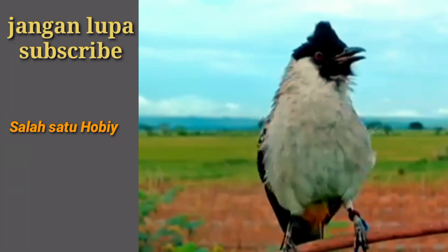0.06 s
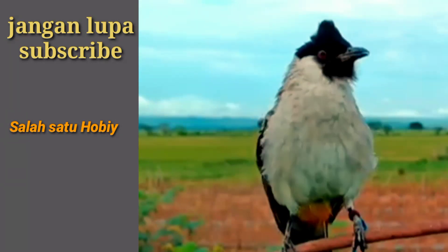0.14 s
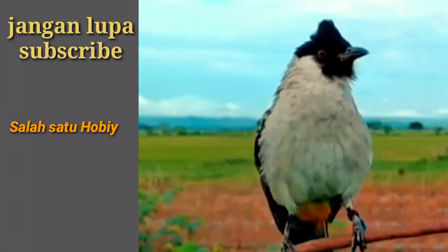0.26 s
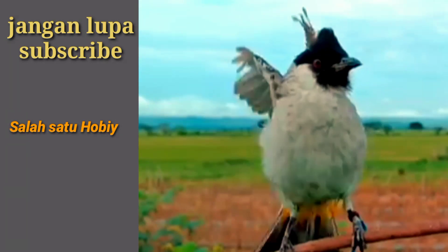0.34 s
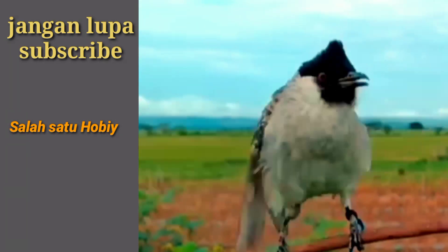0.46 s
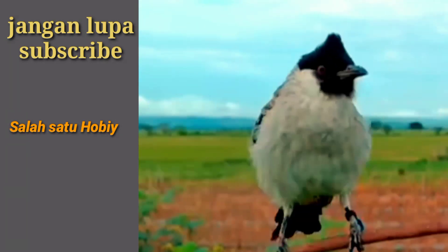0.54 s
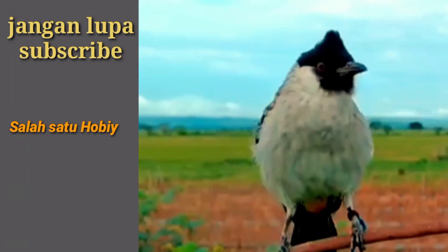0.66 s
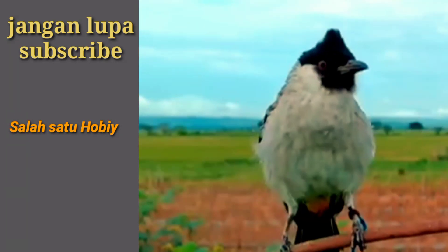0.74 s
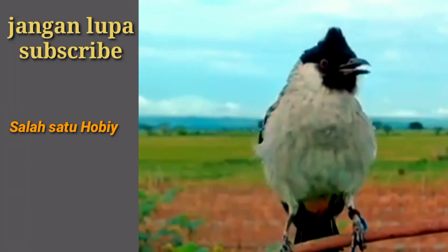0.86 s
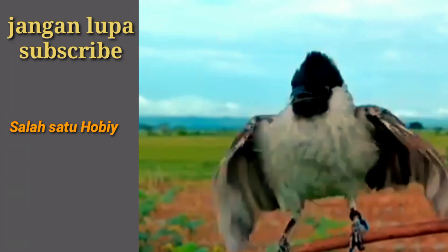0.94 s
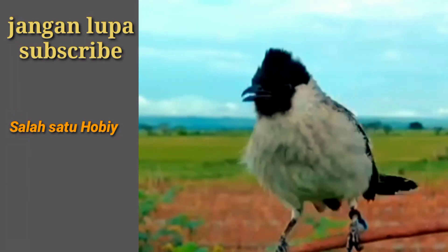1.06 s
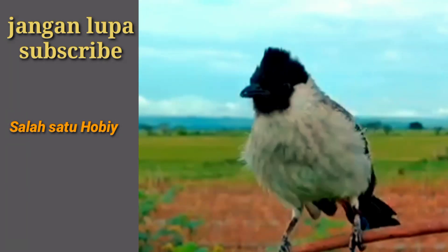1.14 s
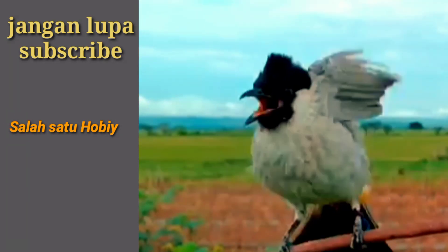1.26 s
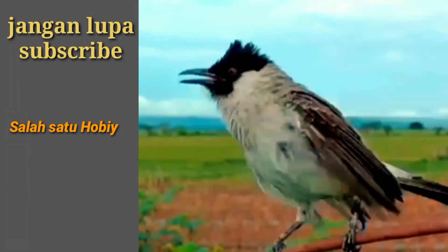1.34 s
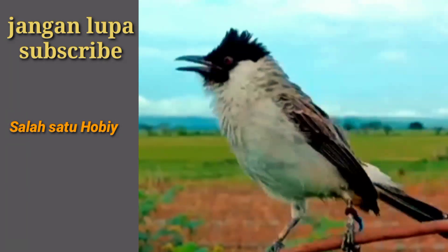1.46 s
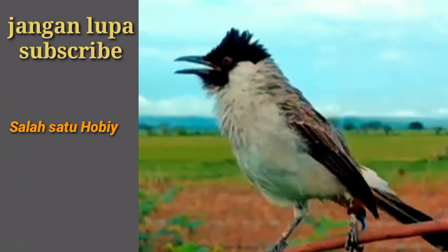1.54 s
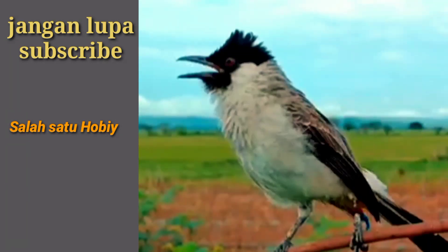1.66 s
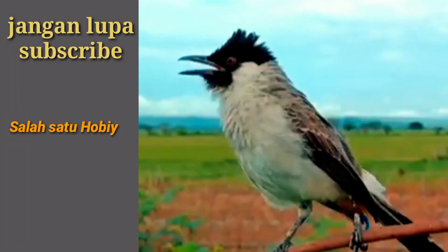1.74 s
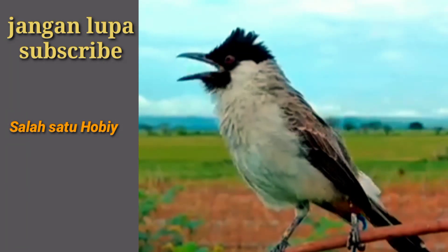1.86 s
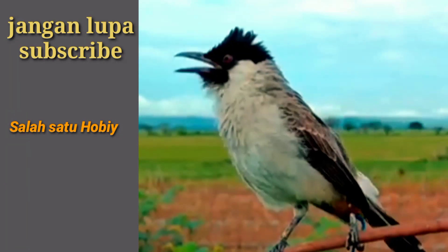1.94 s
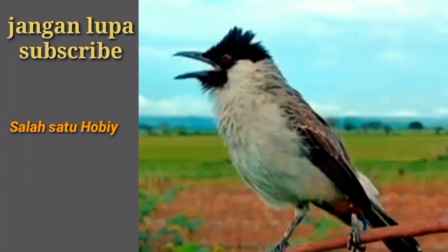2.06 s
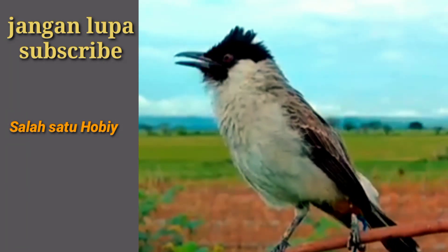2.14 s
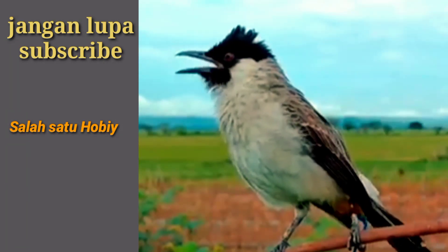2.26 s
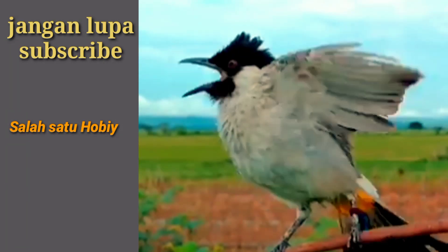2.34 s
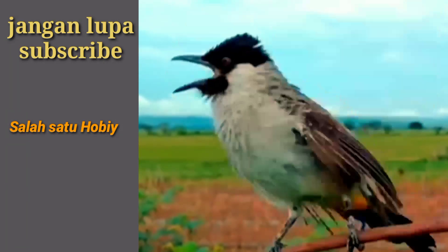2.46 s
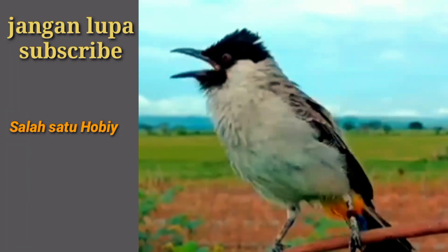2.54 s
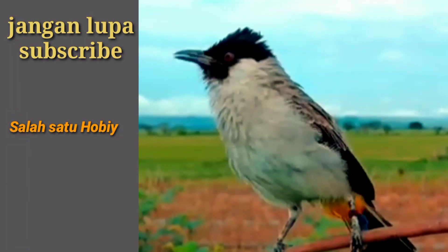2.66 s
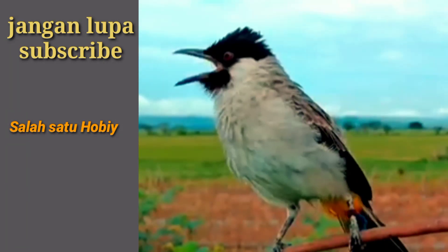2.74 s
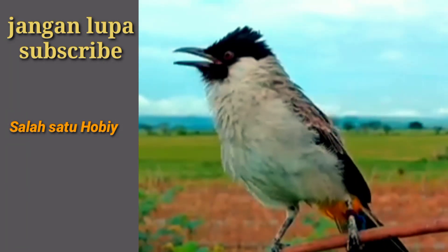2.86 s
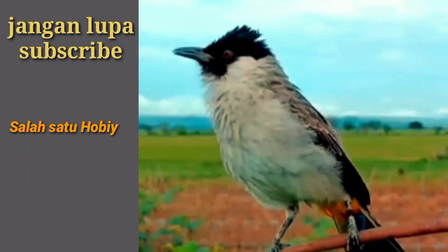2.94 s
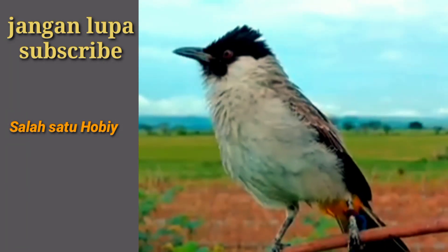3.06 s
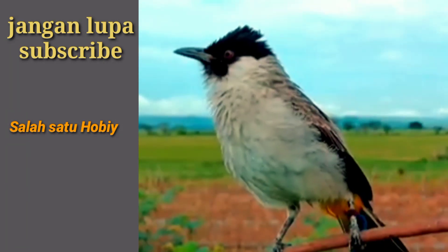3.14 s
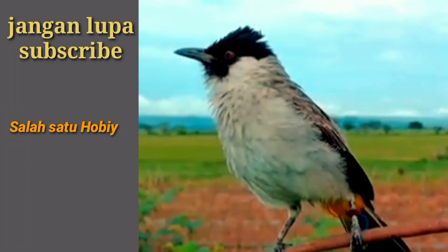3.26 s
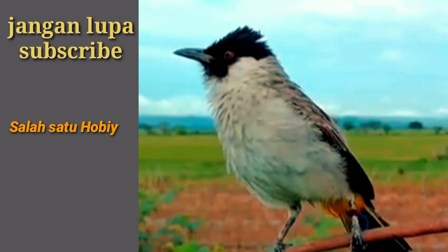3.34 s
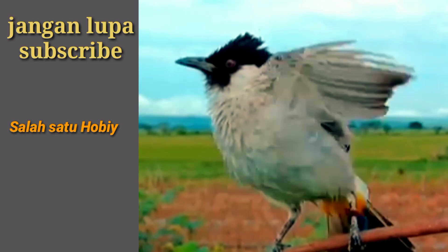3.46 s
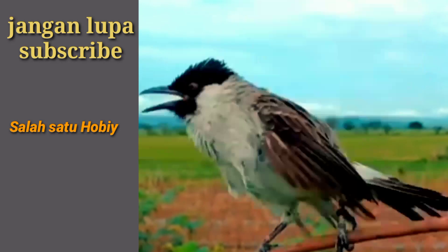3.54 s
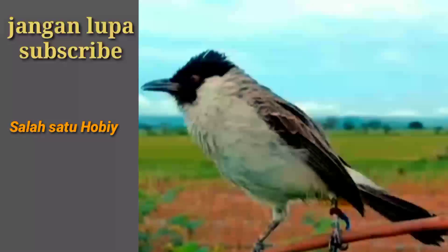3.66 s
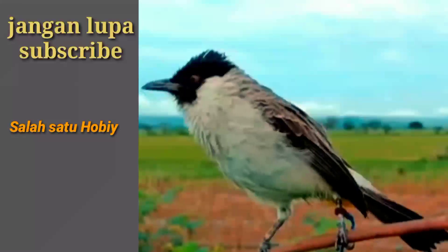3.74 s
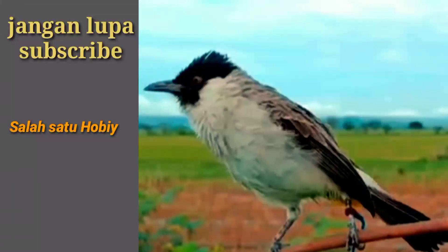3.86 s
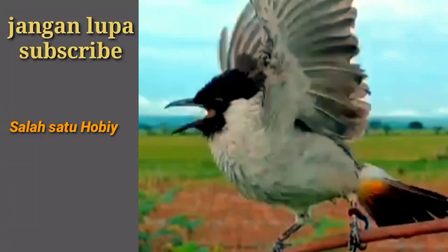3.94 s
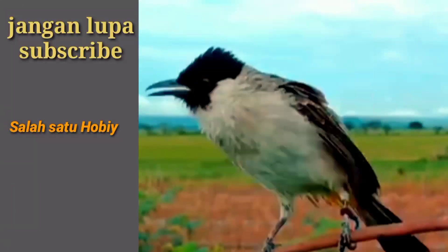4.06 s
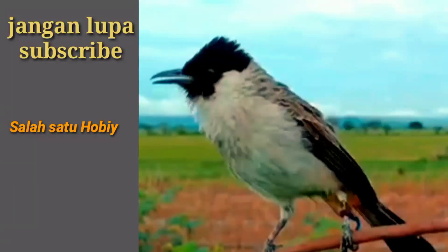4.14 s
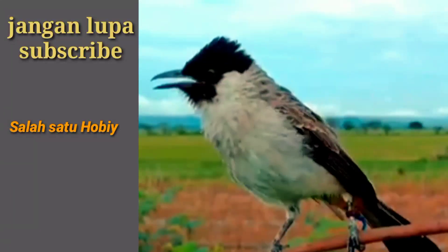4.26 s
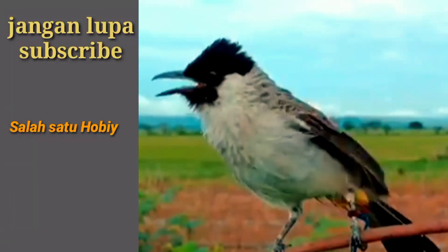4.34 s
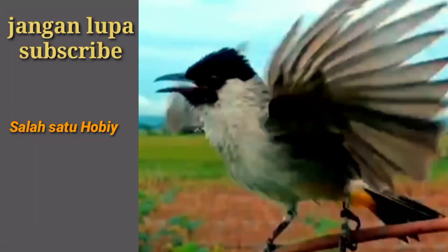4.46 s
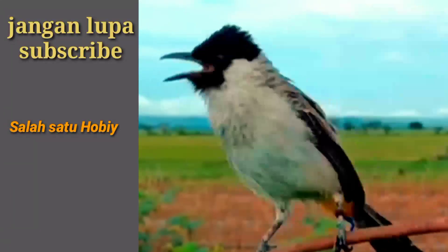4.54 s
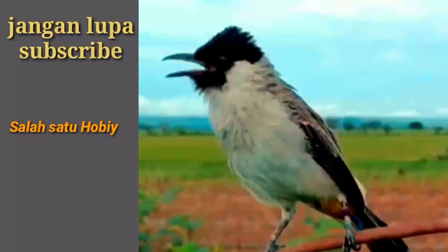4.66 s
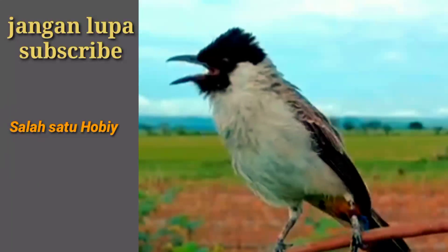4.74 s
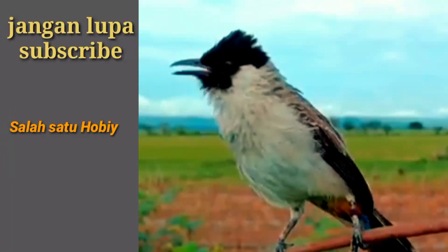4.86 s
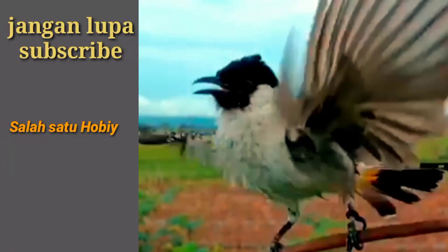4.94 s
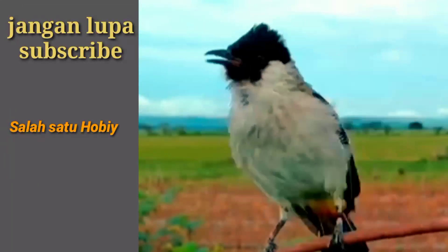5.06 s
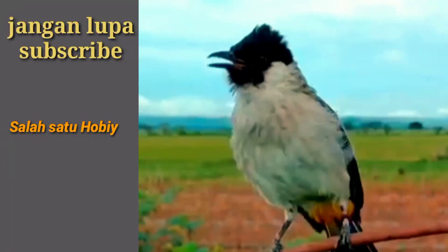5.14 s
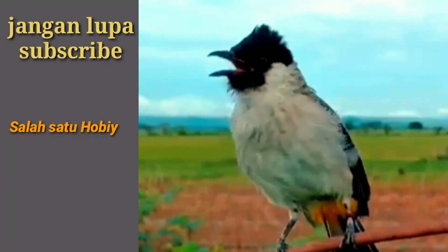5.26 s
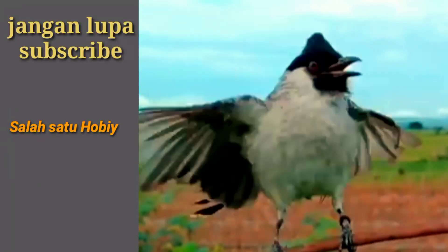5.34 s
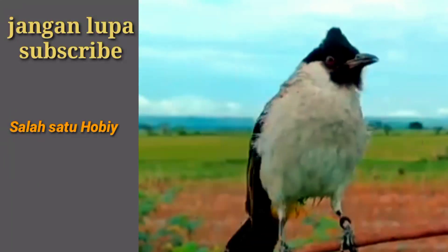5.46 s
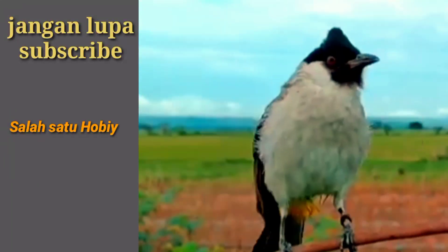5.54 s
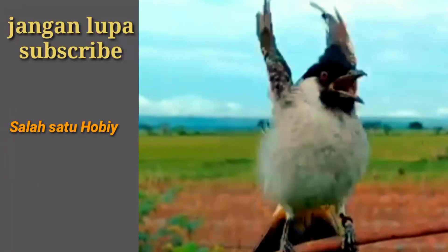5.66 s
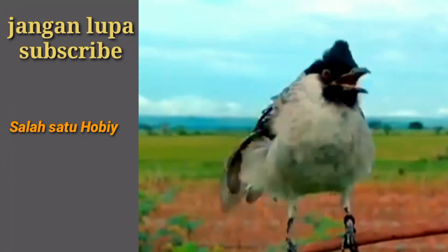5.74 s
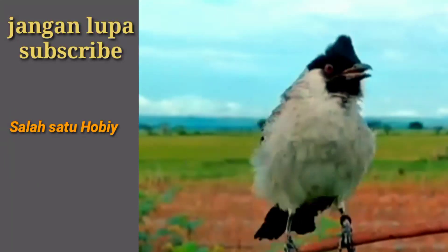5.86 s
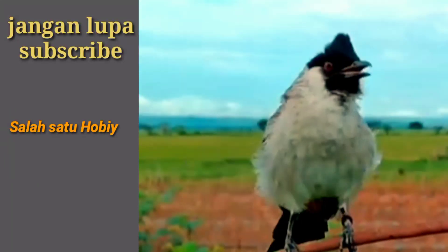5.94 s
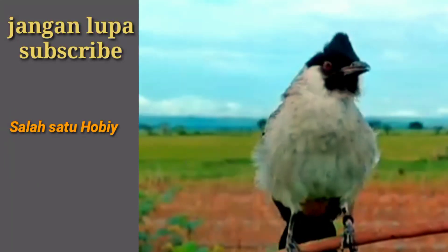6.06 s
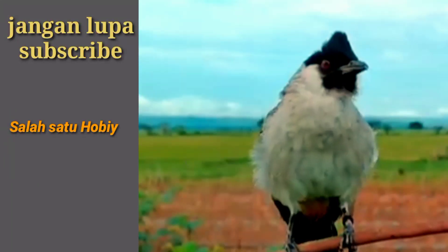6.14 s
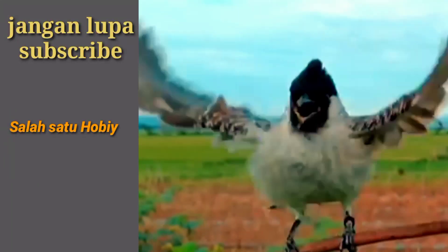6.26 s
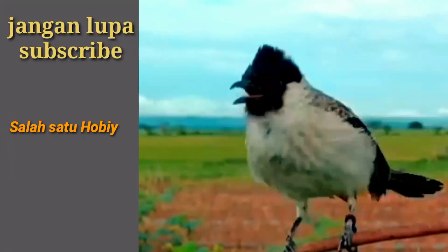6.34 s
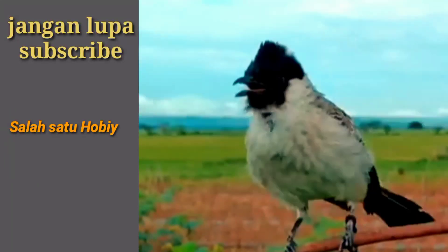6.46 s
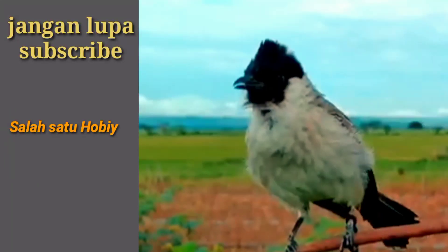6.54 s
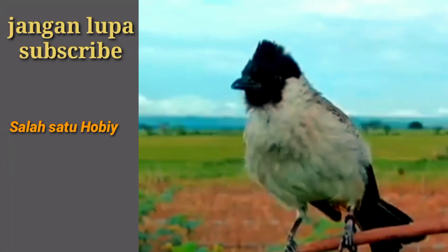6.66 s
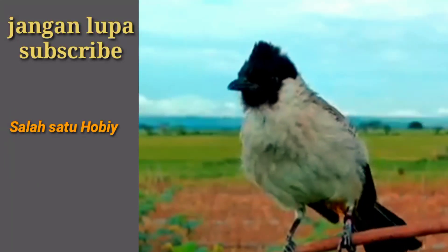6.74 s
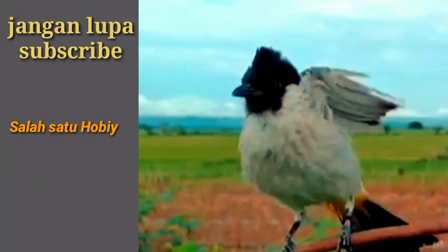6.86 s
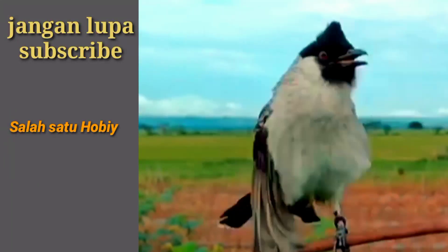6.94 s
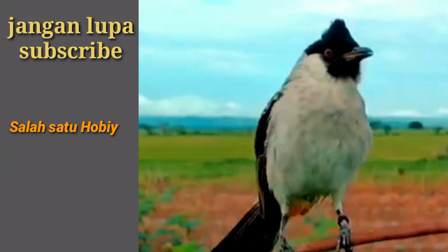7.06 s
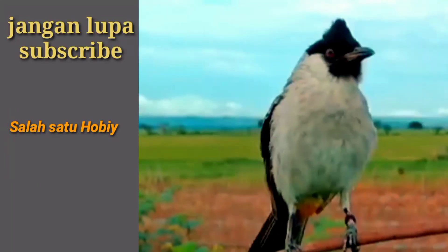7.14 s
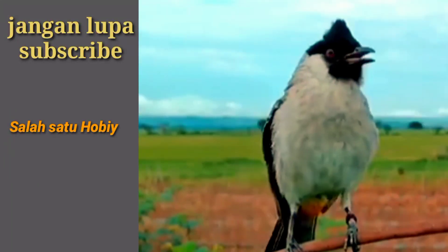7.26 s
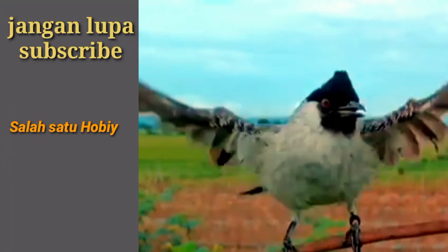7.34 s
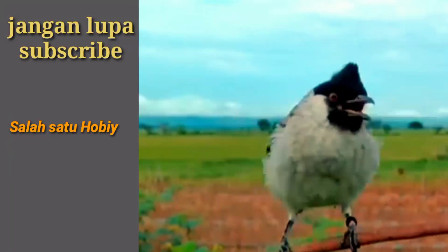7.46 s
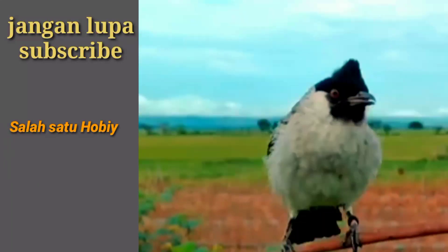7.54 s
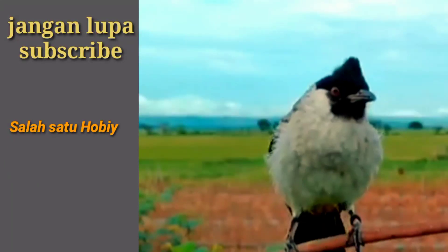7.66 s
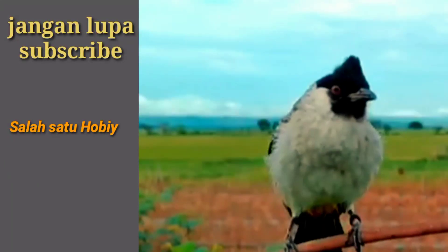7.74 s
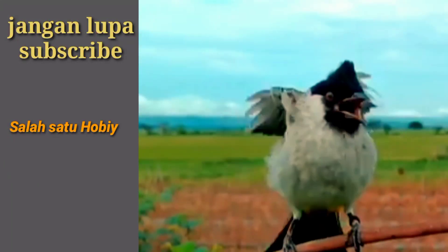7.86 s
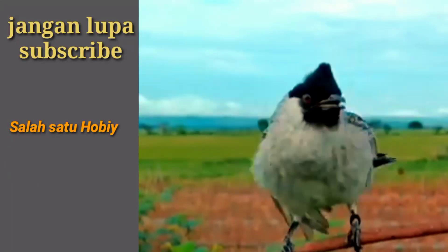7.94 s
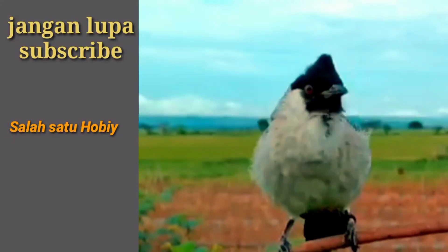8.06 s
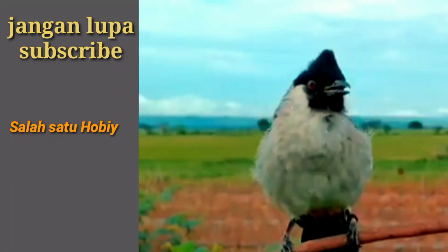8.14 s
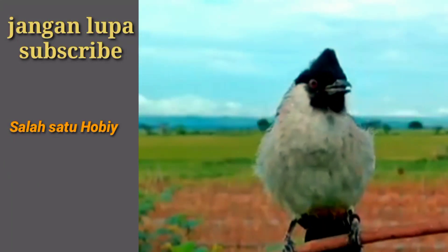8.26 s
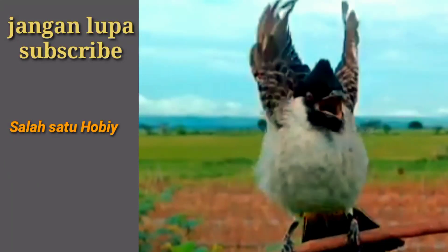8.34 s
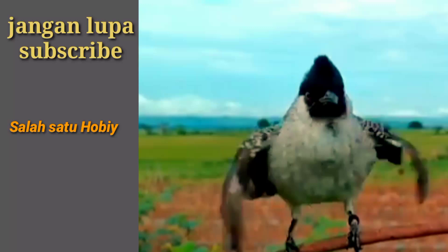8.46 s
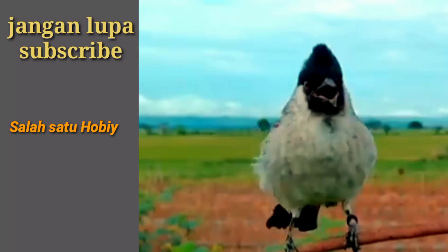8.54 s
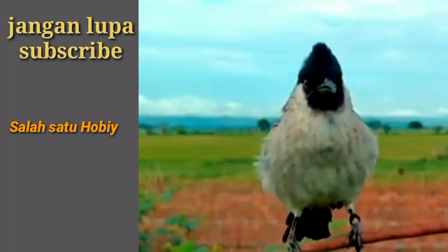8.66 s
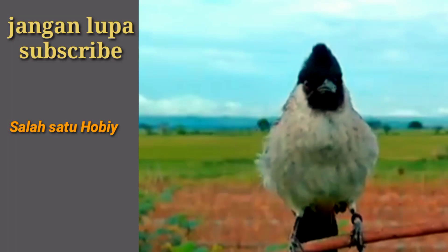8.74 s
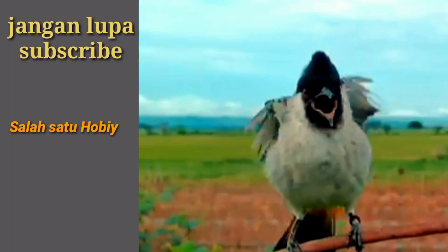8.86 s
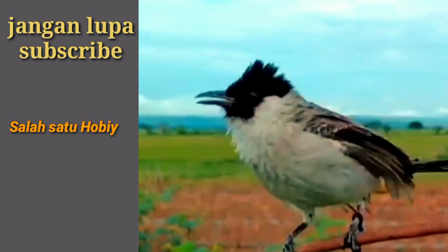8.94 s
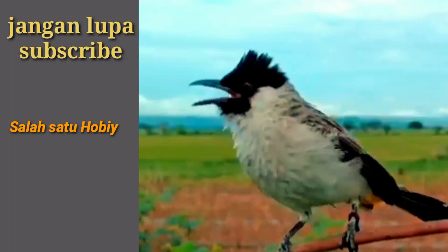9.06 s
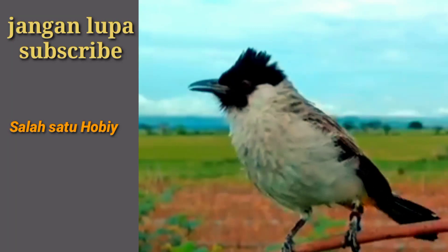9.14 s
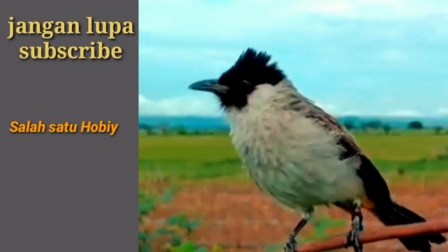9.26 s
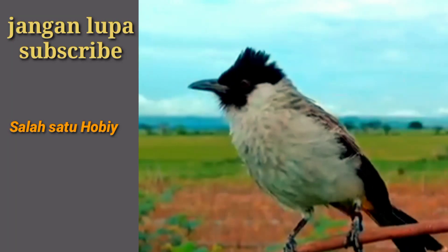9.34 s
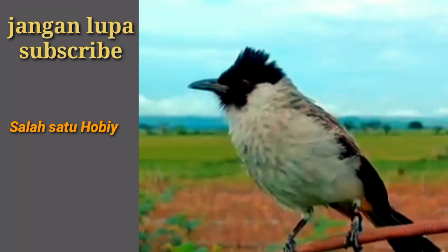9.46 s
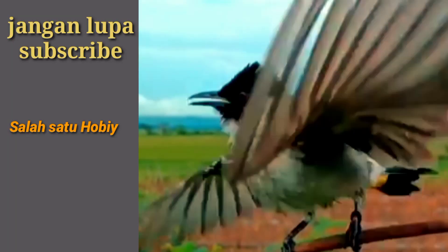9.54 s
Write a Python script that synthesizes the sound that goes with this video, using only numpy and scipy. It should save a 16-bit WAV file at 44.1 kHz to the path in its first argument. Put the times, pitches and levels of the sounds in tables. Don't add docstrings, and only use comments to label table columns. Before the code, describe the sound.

Very loud liquid bird whistles and raspy buzzing chirps burst out over faint insects and low wind rumble; one gust slaps the microphone midway.

```python
import sys
import numpy as np
from scipy import signal
from scipy.fft import rfft, irfft
from scipy.io import wavfile
from scipy.ndimage import uniform_filter1d

SR = 44100
rng = np.random.default_rng(int(sys.argv[2]) if len(sys.argv) > 2 else 0)


def decibels_to_gain(level_db):
    exponent = np.asarray(level_db, float) / 20
    return 10 ** exponent


def store_wav(level_fs):
    pcm = np.round(np.clip(np.atleast_2d(level_fs), -1, 1) * 32767)
    wavfile.write(sys.argv[1], SR, pcm.T.astype(np.int16))


N = 423360
SLAP_S = 3.7835

# (time [s], pitch [Hz], peak level [dB])
PICKUP = [(0, 1740, -53.5), (.006, 1750, -11), (.0135, 1790, -14.5), (.0205, 2180, -11.5),
          (.0279, 2100, -3), (.0344, 2080, -20), (.0394, 1590, -41.5)]
CREAK = [(.0437, 1488, -45.5), (.0477, 1520, -17.5), (.0562, 1426, -21), (.0592, 1484, -14),
         (.0627, 2310, -10), (.0698, 2780, -20)]
SWING = [(.0683, 2627, -19.5), (.0711, 2352, -6.5), (.0746, 3073, 0), (.0821, 2930, 0.5),
         (.0871, 2370, -4.5), (.103, 2360, 3), (.1155, 2276, -3.5), (.123, 2173, -22)]
HOP = [(.1215, 2083, -18.5), (.1265, 1703, -11.5), (.1325, 2293, -0.9), (.1415, 2650, 2),
       (.147, 2470, -1.6), (.1525, 1972, -10)]
SCOOP = [(.151, 2018, -16), (.163, 1794, -1.5), (.1734, 1711, -9), (.185, 1841, -13.5), (.2053, 2390, 3),
         (.2108, 2373, -3), (.2203, 2372, -26)]
LEAD = [(0, 1994, -16), (.0035, 1970, -16.5), (.008, 2440, -7.5), (.0205, 2430, -3), (.0354, 2830, 3),
        (.0474, 2848, 0.5), (.0544, 2650, -22.5)]
HIGH = [(0, 1398, -30.5), (.003, 1749, -24.5), (.0065, 2850, -12), (.0085, 2940, -0.4), (.0239, 2871, 2.5),
        (.0349, 3062, 1), (.0469, 2933, 0.8), (.0574, 3040, -40.5)]
SOFT_HIGH = [(0, 1408, -22.5), (.004, 2327, -21.5), (.006, 2790, -15), (.0095, 2936, -4.5),
             (.0239, 2890, 1), (.0349, 3062, 6), (.0449, 2953, -3), (.054, 3040, -45)]
DROP = [(.069, 2553, -21.5), (.0725, 2700, -5), (.078, 2652, 0.9), (.085, 2251, -6), (.089, 1995, -16),
        (.094, 1703, -12.5), (.103, 1820, -17), (.1065, 2246, -31.5), (.118, 2595, -21)]
RISE = [(.1125, 2526, -37), (.117, 2640, -23.5), (.12, 2602, -10.5), (.131, 2523, 1.5), (.159, 2729, 2.5),
        (.163, 2650, -4.5), (.167, 2693, -13.5), (.171, 2780, -35)]
PEAKED = [(0, 1521, -34.5), (.0055, 1652, -18), (.014, 1826, -8), (.019, 2060, -2.5), (.0225, 2820, -12.5),
          (.027, 2310, -9.5), (.0324, 2110, -3), (.038, 2020, -6.5), (.042, 1956, -15)]
LOOP = [(.0405, 2858, -21), (.054, 3030, -14), (.057, 3700, 1), (.061, 4530, -4), (.066, 4770, -7),
        (.072, 4286, -4.5), (.079, 3450, 0.3), (.085, 2842, 0), (.0915, 2732, -1.5)]
FLICK = [(.09, 2720, -6), (.0935, 3880, 2.5), (.099, 3750, -1.5), (.112, 3107, 0), (.118, 2930, -31),
         (.128, 3270, -27)]
FALL = [(.163, 2540, -31), (.169, 2970, -13), (.189, 3015, -0.2), (.208, 3305, 1.5), (.221, 3010, 3),
        (.231, 2400, -7), (.2405, 1450, -26), (.2505, 950, -26), (.263, 940, -38)]
SLIDE = [(0, 1600, -31.5), (.0055, 2103, -22), (.008, 2910, -1.5), (.0105, 3102, 0), (.0334, 2603, 2.5),
         (.041, 2612, 2.5), (.0455, 2790, -4), (.061, 2677, 2.8), (.0703, 2310, -20)]
SADDLE = [(.069, 1941, -18.5), (.078, 3300, 0.5), (.0838, 3610, -2), (.088, 2964, -0.5), (.114, 2297, 2.5),
          (.1317, 2372, 1.5), (.1417, 2810, 1.5), (.162, 2545, -1.4), (.17, 1544, -22.5)]
CLOSE = [(.1685, 1479, -18.5), (.1742, 1330, -24.5), (.1872, 1586, -13.5), (.1994, 2650, 0.5),
         (.207, 2827, -2.5), (.2227, 2397, -2), (.2257, 1880, -5), (.2347, 2140, -8.5), (.242, 1980, -38.5)]
GULP = [(0, 1856, -46.5), (.0025, 1827, -19), (.0065, 1833, -15.5), (.011, 1463, -13), (.0155, 1473, -16.5),
        (.0264, 1800, -11.5), (.031, 2132, 0.5)]
BUBBLE = [(.0295, 2044, -20), (.0329, 2900, 5), (.0369, 3327, -7), (.0405, 2506, -1.5), (.0454, 1988, -5),
          (.0619, 2262, 2), (.071, 1493, -6), (.0835, 1800, -6.5), (.0965, 2004, -31)]
CHIRP = [(.095, 2050, -19.5), (.1019, 2406, -1.5), (.1123, 2548, 1.5), (.1168, 3043, -1), (.124, 2720, 2.5),
         (.137, 2536, 0.5), (.1425, 1950, -5.5), (.149, 2204, -1.5), (.161, 2305, -38)]
# (time [s], length [factor], first note's start pitch [factor], its end pitch [factor], level [dB])
CHATTER = [(1.812, 1.004, 1.04, 1.007, -0.29), (2.0328, 0.99, 1.063, 1, 0.013), (2.2554, 1, 1.05, 1, -0.36),
           (4.5136, 0.99, 1.035, 1.016, -0.12), (4.7343, 1, 1.056, 1, -0.3),
           (4.9642, 1.005, 1.006, 1.001, 0.17), (5.198, 1.005, 1.002, 1.028, 0.059),
           (5.4478, 0.99, 0.98, 1.01, 0.49)]
TRILLS = [(2.57, 1.0055, 1.001, 1.001, 0.12), (2.9337, 1.002, 1.001, .96, -0.24)]
WARBLES = [(5.9819, 1.001, 1.03, .99, 0.13), (6.565, 1.001, 1.047, 0.96, -0.074)]
GURGLES = [(8.2296, .95, 0.85, 1.01, -0.15), (8.6573, 0.97, 0.99, 0.95, -0.27),
           (9.1536, 0.99, 0.93, 1.02, -0.75)]
# ([(note shape, second-partial lift [dB], half-pitch line level [dB])], [sung phrases, as above])
PHRASES = [([(PICKUP, -2.9, -44.5), (CREAK, -12, -37.5), (SWING, 2, -44), (HOP, -6, -43.5),
           (SCOOP, -11, -51)], [(.0748, .999, 1.06, 0.99, .1)]), ([(LEAD, 1.5, -45.5), (DROP, 1.5, -46.5),
           (RISE, -1.5, -34)], [(1.6004, 1.015, 1, 0.99, -0.87)]), ([(HIGH, 2.2, -32.5)],
           [(2.4815, 1.044, 1.03, 1.083, -0.091)]), ([(SOFT_HIGH, 13, -42), (DROP, 2.8, -54),
           (RISE, -1.5, -35.5)], [(4.2985, 0.98, 0.97, 1, -2.1)]), ([(HIGH, 5.7, -36), (DROP, 1.7, -48.5),
           (RISE, 0.14, -33)], CHATTER), ([(PEAKED, 35, -27), (LOOP, 11, -38.5), (FLICK, 3, -35),
           (FALL, 4.7, -35.5)], TRILLS), ([(SLIDE, 1.5, -29.5), (SADDLE, -0.86, -33), (CLOSE, -8, -46)],
           WARBLES), ([(GULP, 1.9, -8), (BUBBLE, -2.3, -49), (CHIRP, -7, -38.5)], GURGLES)]
# (time [s], pitch [Hz], peak level [dB])
DIP = [(0, 3294, -47), (.008, 3280, -33), (.018, 2874, -28), (.03, 2380, -38.5), (.04, 2810, -28),
       (.056, 3080, -27.5), (.066, 2990, -36), (.078, 3115, -45)]
RIPPLE = [(0, 2760, -57), (.013, 2570, -34), (.03, 2715, -33), (.04, 2433, -34), (.05, 2414, -38.5),
          (.07, 2663, -30), (.08, 2480, -34.5), (.095, 2486, -46.5), (.105, 2620, -56)]
HOOK = [(0, 2700, -55), (.01, 2840, -34), (.016, 3140, -33), (.024, 2900, -31), (.036, 2800, -28.5),
        (.044, 2683, -39), (.05, 2350, -52.5)]
STEP = [(0, 2230, -52), (.008, 2285, -30), (.017, 2585, -46), (.027, 3035, -20), (.037, 2900, -28),
        (.052, 2500, -29), (.062, 2380, -39.5)]
# (note shape, time [s], length [factor], level [dB])
ANSWERS = [(DIP, 1.25, 1, 0), (RIPPLE, 1.353, .95, 0), (DIP, 7.722, 1.25, -5), (RIPPLE, 7.846, 1, -3),
           (HOOK, 8.956, 1, 0), (STEP, 8.181, 1, 0)]


def read(points, at):
    x, value = np.transpose(points)
    return np.interp(at, x, value)


def evened(x):
    return x / np.sqrt(np.mean(x ** 2) + 1e-20)


def smooth_noise(n, size):
    return evened(uniform_filter1d(rng.standard_normal(n), size=size))


def add(mix, s, sound):
    at = round(s * SR)
    part, sound = mix[max(at, 0):], sound[max(-at, 0):]
    part[:len(sound)] += sound[:len(part)]


def phase(hz):
    return 2 * np.pi * np.cumsum(hz) / SR


def resonate(x, hz, width_hz):
    turn = np.exp(1j * phase(hz * np.ones(len(x))))
    r = np.exp(-np.pi * width_hz / SR)
    return 2 * (turn * signal.lfilter([(1 - r) ** 2], [1, -2 * r, r * r], x / turn)).real


def contour(rows, stretch=1):
    s, hz, db = np.transpose(rows)
    t = np.arange(0, (s[-1] - s[0]) * stretch, 1 / SR)
    at = t / stretch + s[0]
    hz, db = (uniform_filter1d(np.interp(at, s, c), size=45, mode="nearest") for c in (hz, db))
    hz = uniform_filter1d(hz, size=70, mode="nearest")
    return t / t[-1], hz, decibels_to_gain(db) * signal.windows.tukey(len(t), 130 / len(t))


def chorus():
    # (centre [Hz], width [Hz], level [dB])
    bands_db = [
        (3700, 300, -74.5),
        (6100, 1100, -52),
        (7420, 1200, -59),
        (9205, 1300, -65.5),
        (10200, 1800, -64),
        (256, 57, -67.5),
    ]
    throb = 1 + 0.19 * np.sin(2 * np.pi * 62 * np.arange(N) / SR)
    bands = []
    for hz, width_hz, db in bands_db:
        band = resonate(resonate(rng.standard_normal(N), hz, width_hz), hz, width_hz)
        bands.append(decibels_to_gain(db) * evened(band))
    hiss = decibels_to_gain(-58) * rng.standard_normal(N)
    edge = signal.butter(8, 10800, fs=SR, output="sos")
    return signal.sosfilt(edge, sum(bands) + (throb - 1) * bands[1] + hiss)


def wind():
    # (frequency [Hz], level [dB per Hz])
    rumble_db = [(12, -30), (20, 4), (82, 0), (201, -19), (380, -46), (700, -68), (910, -100), (1540, -120)]
    # (time [s], peak level [dB], dying time [s])
    gust_rows = [(0.325, -29, 0.45), (0.69, -27.5, 0.34), (1.016, -25, 0.15), (1.257, -29, 0.071),
                 (1.555, -15, 0.024), (2.671, -27, 0.026), (3.206, -27, 0.061), (3.74, -16.5, 0.046),
                 (3.776, 5.5, 0.027), (4.236, -7, 0.039), (4.462, -26, 0.077), (4.671, -24, 0.11),
                 (5.2, -23, 0.079), (5.925, -30, 0.056), (6.489, -19.5, 0.034), (8.3, -39, 0.024),
                 (9.065, -22, 0.055)]
    # (time [s], pressure step [full scale])
    flaps = [
        (3.801, -0.67),
        (3.8046, 1),
        (3.821, 0.43),
    ]
    breeze_db, rise_s, trim_db = -45.5, 0.0042, -1.5
    roar_db, lumps_db = -24.5, 3
    slap_hz, slap_db, slap_dying_s, flap_rise_s, flap_dying_s = 88, 3, .036, 0.00041, .004

    hz = np.fft.rfftfreq(N, 1 / SR)
    f, db = np.transpose(rumble_db)
    tilt_db = np.interp(np.log(hz + 1), np.log(f), db, right=-90)
    rumble = irfft(rfft(rng.standard_normal(N)) * decibels_to_gain(tilt_db), N)
    lumps = evened(uniform_filter1d(uniform_filter1d(rng.standard_normal(N), size=1800), size=1800))

    s, peak_db, dying_s = np.transpose(gust_rows)[..., None]
    late = np.arange(0, N + 64, 64) / SR - s - rise_s
    gusts = decibels_to_gain(peak_db + trim_db) * np.exp(-np.where(late < 0, -late / rise_s, late / dying_s))
    force = np.interp(np.arange(N) / 64, np.arange(late.shape[1]), decibels_to_gain(breeze_db) + gusts.sum(0))
    turbulence = evened(resonate(rng.standard_normal(N), 200, 590))
    roar = decibels_to_gain(roar_db + lumps_db * lumps) * force ** 1.5 * turbulence

    t = np.arange(N) / SR - SLAP_S
    slap = np.exp(-(t / slap_dying_s) ** 2)
    swing = decibels_to_gain(slap_db) * slap * np.sin(2 * np.pi * slap_hz * t)
    ring = (t > 0) * np.clip(swing, -.8, .65)
    after = np.arange(1500) / SR
    for s, step in flaps:
        add(ring, s, step * np.exp(-after / flap_dying_s) * (1 - np.exp(-after / flap_rise_s)))
    return evened(rumble * decibels_to_gain(lumps_db * lumps)) * force * (1 - slap) + ring + roar


def crickets():
    # (first chirp [s], last chirp [s], pitch [Hz], level [dB])
    bouts = [(.325, 0.428, 4440, -48), (1.289, 1.432, 4450, -46), (3.2, 3.692, 4460, -47),
             (3.84, 3.94, 4370, -61), (5.388, 5.823, 4440, -52), (6.829, 7.069, 4450, -47),
             (7.21, 7.408, 4450, -47), (8.813, 9.007, 4450, -49), (9.293, 9.49, 4460, -47),
             (6.845, 7.081, 4800, -53), (7.246, 7.471, 4830, -50), (8.834, 8.996, 4830, -54),
             (0.785, 1.042, 4780, -58), (7.826, 7.954, 4780, -55), (2.84, 2.9, 4780, -56),
             (1.679, 1.976, 4430, -51), (2.21, 2.45, 4750, -58), (3.4, 3.51, 4780, -58)]
    out, t = np.zeros(N), np.arange(0, .014, 1 / SR)
    for first, last, hz, db in bouts:
        stroke = decibels_to_gain(db) * np.sin(2 * np.pi * hz * t * (1 - 1.4 * t)) * np.hanning(len(t))
        period_s = .049 if hz < 4600 else .057
        for s in np.linspace(first, last, round((last - first) / period_s) + 1):
            first_db, second_db = 1.5 * rng.standard_normal(2) - 1
            add(out, s - .006, decibels_to_gain(6.5 + first_db) * stroke)
            add(out, s + .0075, decibels_to_gain(6 + second_db) * stroke)
    return out


def far_bird():
    # (time [s], length [s], start pitch [Hz], end
    # pitch [Hz], level [dB])
    glides = [(0.997, 0.079, 3200, 4470, -44.5), (4.03, .08, 3900, 4170, -58),
              (7.419, 0.073, 2920, 3600, -53), (7.992, 0.055, 3200, 3900, -40),
              (8.429, 0.023, 3670, 3200, -45), (4.24, .055, 3200, 2600, -50),
              (8.497, 0.036, 3500, 3660, -35), (8.864, 0.055, 3500, 3680, -34),
              (4.68, .055, 1700, 2200, -51), (9.106, 0.032, 3286, 3200, -27), (9.51, 0.07, 3500, 3800, -52),
              (8.615, .022, 3000, 2800, -33), (8.705, .055, 3400, 3300, -29), (5.355, .04, 3800, 3300, -52),
              (9.003, .028, 2100, 1800, -52), (8.01, .035, 1900, 2000, -54), (1.405, .04, 3300, 3700, -48),
              (7.73, .05, 3330, 3300, -45), (3.412, .07, 1400, 1150, -60), (3.695, .035, 1000, 3600, -52),
              (5.42, .03, 3700, 3200, -52), (5.16, .04, 3400, 2000, -55), (4.45, .06, 3500, 3900, -56)]
    song = np.zeros(N)
    for s, length_s, start_hz, end_hz, db in glides:
        width_hz = 50 + 0.48 * abs(end_hz - start_hz)
        hz = np.linspace(start_hz, end_hz, round(length_s * SR))
        line = np.sin(phase(hz)) * 120 / width_hz
        blur = evened(resonate(rng.standard_normal(len(hz)), hz, width_hz))
        add(song, s, decibels_to_gain(db) * evened(line + 0.53 * blur) * signal.windows.tukey(len(hz), .5))
    for shape, s, stretch, db in ANSWERS:
        u, hz, gain = contour(shape, stretch)
        flicker_db = 2.3 * smooth_noise(len(u), 250)
        add(song, s, decibels_to_gain(db) * gain * decibels_to_gain(flicker_db) * np.sin(phase(hz)))
    return song


def whistle(shape, overtone_db, half_db, stretch, first, last, db):
    # (pitch [Hz], level [dB])
    partial_db = [(950, 10), (1300, 0), (1650, -10), (2050, -17), (2250, -32), (2600, -40), (3200, -38),
                  (4500, -40)]
    waver_share, shimmer_db, patchiness_db = 0.0032, 0.46, 2.5
    rasp_share, rasp_below_db, crackle_db = .1, -28, -13
    full_leak_db, fast_hz_per_s = 24.5, 130000

    u, hz, gain = contour(shape, stretch)
    waver, shimmer = smooth_noise(len(u), 120), smooth_noise(len(u), 120)
    weak = np.clip(20 * np.log10(gain + 1e-9) / rasp_below_db, 0, 1)
    rasp = rasp_share * weak ** 2 * smooth_noise(len(u), 25)
    hz = hz * (first + (last - first) * u + waver_share * waver + rasp)
    gain = gain * decibels_to_gain(shimmer_db * shimmer)
    turn = phase(hz)

    patchy_db = patchiness_db * evened(uniform_filter1d(shimmer, size=250))
    glide_hz_per_s = uniform_filter1d(abs(np.gradient(hz)), size=90) * SR
    leak_db = full_leak_db * weak * np.minimum(glide_hz_per_s / fast_hz_per_s, 1)
    second = decibels_to_gain(read(partial_db, hz) + overtone_db + patchy_db) + decibels_to_gain(leak_db - 44)
    tone = np.sin(turn) + second * np.sin(2 * turn + 1) + decibels_to_gain(-28) * second * np.sin(3 * turn)
    halves = decibels_to_gain(min(half_db, -34)) * np.sin(turn / 2)
    halves = halves + decibels_to_gain(half_db - patchy_db) * np.sin(3 * turn / 2)

    air = evened(resonate(rng.standard_normal(len(u)), hz + 300, 1400))
    ends = np.abs(2 * u - 1) ** 12
    breath = (decibels_to_gain(-41.5) + decibels_to_gain(crackle_db) * ends * weak) * air
    return decibels_to_gain(db + 2) * gain * (tone / np.sqrt(1 + second ** 2) + halves + breath)


def buzz(length_s, top_hz, crest_s, db, from_hz, to_hz):
    # (time [share of length], climb [share], level [dB])
    arch = [(0, 0.022, -34.5), (.06, .1, -14.5), (.18, .42, -5.5), (.24, 0.76, -2), (.33, 0.9, -1),
            (.6, 0.97, -0.5), (.85, .85, -1), (.93, 0.57, -5.5), (1, 0.42, -23)]
    start_hz, throat_width_hz, throat_steep = 970, 532, 0.7
    beak_hz, beak_width_hz, beak_db = 8100, 470, -16.5
    tight_hz, flutter_per_s, faster_per_hz, slowing_per_s2 = 2000, 106, .022, -420
    depth, deeper_per_hz, early_depth = .062, .00022, 0.054
    stumble_turns, uneven_share = .15, .15
    jitter_share, rougher_per_hz, ragged, late_climb_per_hz = .01, .00006, 0.099, 0.0011
    hollow_db, throb_db, full_pinch_db = -24, 15, -3.5

    u, climb, gain = contour(arch, length_s)
    slack_hz, t = max(tight_hz - top_hz, 0), u * length_s - crest_s
    stumble, uneven = smooth_noise(len(u), 350), smooth_noise(len(u), 350)
    rate = flutter_per_s + faster_per_hz * slack_hz + slowing_per_s2 * t / 2
    flutter = np.cos(2 * np.pi * t * rate + stumble_turns * stumble)
    late = depth + deeper_per_hz * slack_hz
    opening = np.interp(u, [.12, .25, .6], [0, late + early_depth, late])
    swing = flutter * (1 + uneven_share * uneven) * opening

    jitter = smooth_noise(len(u), 30)
    roughness = jitter_share + rougher_per_hz * slack_hz + ragged * (1 - climb) ** 2
    climb_hz = (top_hz - start_hz) * climb * (1 + late_climb_per_hz * slack_hz * (u - .5))
    hz = (start_hz + climb_hz) * np.exp(swing + roughness * jitter)
    turn = phase(hz)

    tone, throat_hz = 0, from_hz + (to_hz - from_hz) * u
    partials_db = [1.5 - 0.00086 * slack_hz + hollow_db * swing, 1.5, -4, -10.5, -11, -15]
    for k, part_db in enumerate(partials_db, 1):
        throat = (1 + ((hz * k - throat_hz) / throat_width_hz) ** 2) ** -throat_steep
        beak = decibels_to_gain(beak_db) / (1 + ((hz * k - beak_hz) / beak_width_hz) ** 2)
        tone = tone + decibels_to_gain(part_db) * (throat + beak) * np.sin(k * turn)
    air = evened(resonate(rng.standard_normal(len(u)), 3700, 4400))
    voice = evened(tone) + decibels_to_gain(-27) * gain ** 0.79 * air + decibels_to_gain(-25) * np.sin(3 * turn / 2)

    pinch_db = full_pinch_db * max(1 - slack_hz / 150, 0) * np.maximum(flutter, 0) ** 2 * (1 + .5 * stumble)
    level_db = db + pinch_db + throb_db * swing + 1.1 * uneven + 0.65 * (flutter - 3)
    return decibels_to_gain(level_db) * gain * voice


def snap(db):
    return decibels_to_gain(db) * np.diff(rng.standard_normal(150)) * np.exp(-np.arange(149) / 45)


def bulbul():
    # (time [s], length [s], top pitch [Hz], a flutter crest after the start [s], level [dB])
    calls = [(-.074, 0.086, 1956, .047, -1.7), (0.598, 0.072, 1606, .0415, -4.5),
             (1.056, 0.078, 1498, .0415, -6), (1.169, 0.084, 1664, 0.042, -4),
             (1.441, 0.094, 1940, .0456, 0), (3.722, 0.074, 1852, .043, -4),
             (4.143, 0.087, 2009, .046, -3.5), (5.843, 0.087, 2024, .0469, 1),
             (6.436, 0.087, 1954, .0408, 1.5), (7.113, 0.082, 1732, .0425, -2.5),
             (7.49, 0.083, 1772, .0449, -3), (7.636, 0.085, 1462, .0475, -4.5),
             (8.046, 0.09, 1836, 0.047, -0.5), (8.526, 0.093, 2117, .0494, 1.45),
             (9.028, 0.088, 2060, 0.045, 0.5)]
    # (start [Hz], end [Hz])
    throats = [(3416, 3370), (3520, 3800), (3300, 3900), (3800, 4680), (3700, 3800), (3700, 3800),
               (3700, 3800), (3700, 3700), (3700, 3400), (3500, 3670), (3610, 3820), (3670, 4570),
               (3750, 4100), (3988, 3320), (3750, 3530)]
    # (time [s], level [dB])
    snaps = [(7.2, -38.5), (8.1, -45), (3.9, -48), (4.24, -44.5), (8.163, -49.5), (1.9, -32), (2.4, -36.5),
             (3.4, -41.5)]
    song = np.zeros(N)
    for notes, sung in PHRASES:
        for s, stretch, first, last, db in sung:
            for k, (shape, overtone_db, half_db) in enumerate(notes):
                bend = (first, last) if k == 0 else (1, 1)
                note = whistle(shape, overtone_db, half_db, stretch, *bend, db)
                add(song, s + shape[0][0] * stretch, note)
    for (s, *call), throat in zip(calls, throats):
        add(song, s, buzz(*call, *throat))
    for s, db in snaps:
        add(song, s, snap(db))
    return song


def field(x):
    near_db, near_t60_s, far_t60_s = 13, 0.057, 0.27
    taps, at = np.zeros(SR // 2), np.arange(300, SR // 2 - 22, 22)
    taps[at + rng.integers(0, 22, len(at))] = rng.choice([-1., 1.], len(at))
    t = np.arange(len(taps)) / SR
    taps *= decibels_to_gain(-60 * t / far_t60_s) + decibels_to_gain(near_db - 60 * t / near_t60_s)
    return signal.fftconvolve(x, taps / np.linalg.norm(taps))[:N]


def scene():
    duck, recovery_s = 0.71, 0.22
    near, far, chirps = bulbul(), far_bird(), crickets()
    thin = signal.lfilter(*signal.butter(4, 2450, "high", fs=SR), near)
    echoes = field(decibels_to_gain(-28.5) * thin + decibels_to_gain(-3) * far + decibels_to_gain(-11.5) * chirps)
    air = near + far + echoes + chirps + chorus()
    late = np.arange(N) / SR - SLAP_S - .007
    ducking = 1 - duck * (late > 0) * np.exp(-(late / recovery_s) ** 2)
    return (air * ducking + wind())[None]


def band_limit(x):
    return signal.sosfilt(signal.butter(12, 15710, fs=SR, output="sos"), x)


def record(dry):
    ceiling, knee = decibels_to_gain(-0.86), 9
    clipped = dry / (1 + abs(dry / ceiling) ** knee) ** (1 / knee)
    edge = signal.firwin2(255, [0, 10500, 12500, 15300, 15700, SR / 2], [1, 1, .75, .7, 0, 0], fs=SR)[None]
    return band_limit(signal.oaconvolve(clipped, edge, "same"))


dry = scene()
out = record(dry)
store_wav(out)
```